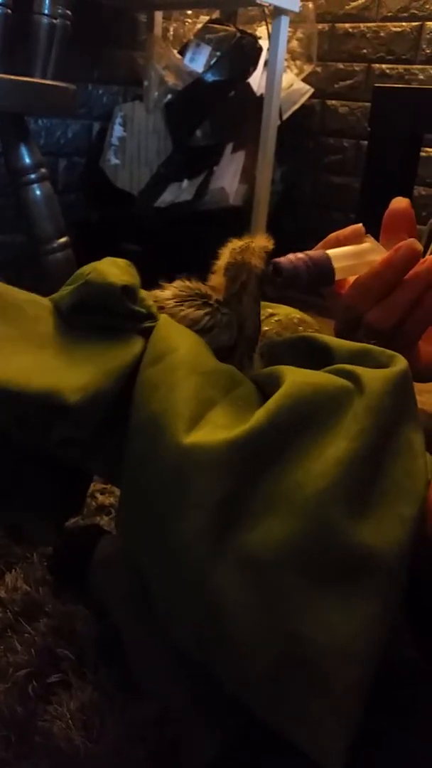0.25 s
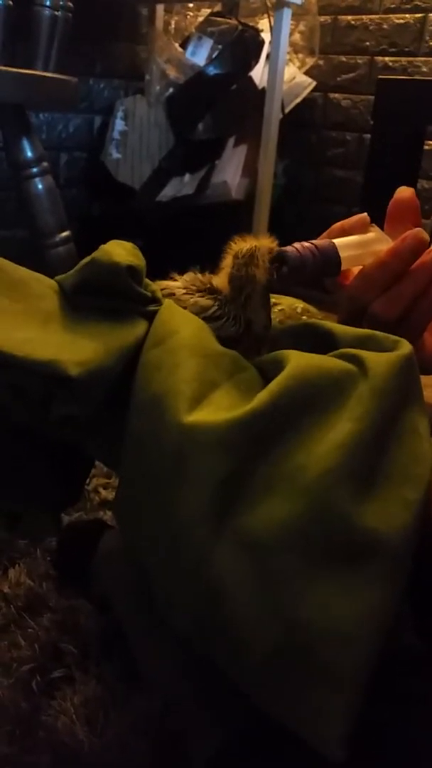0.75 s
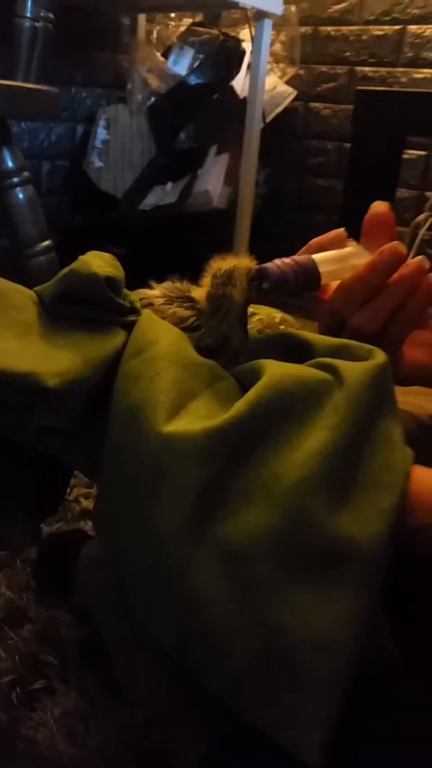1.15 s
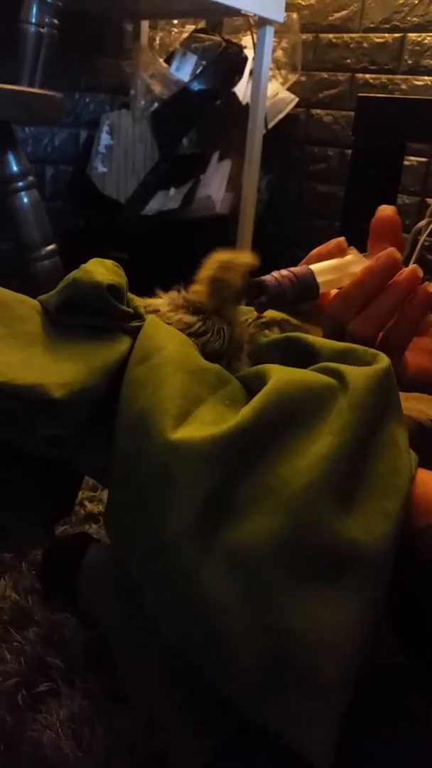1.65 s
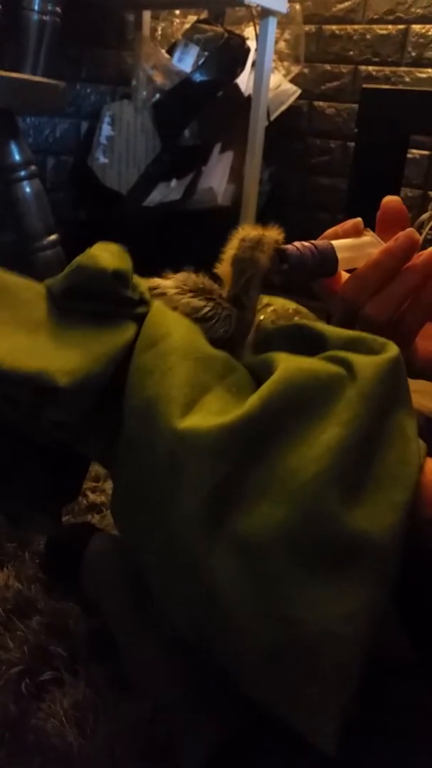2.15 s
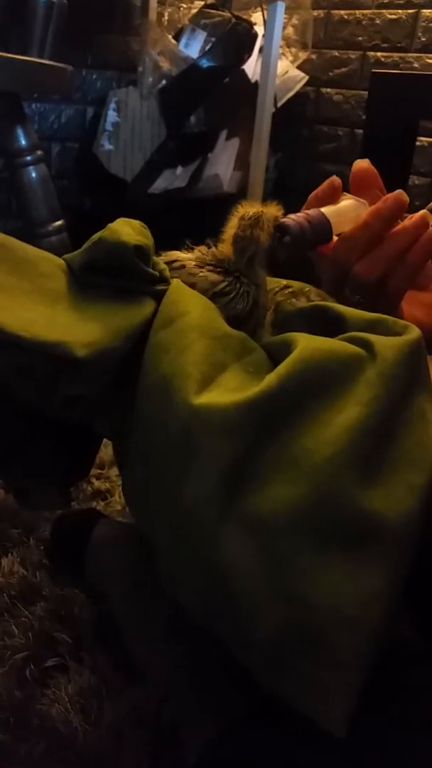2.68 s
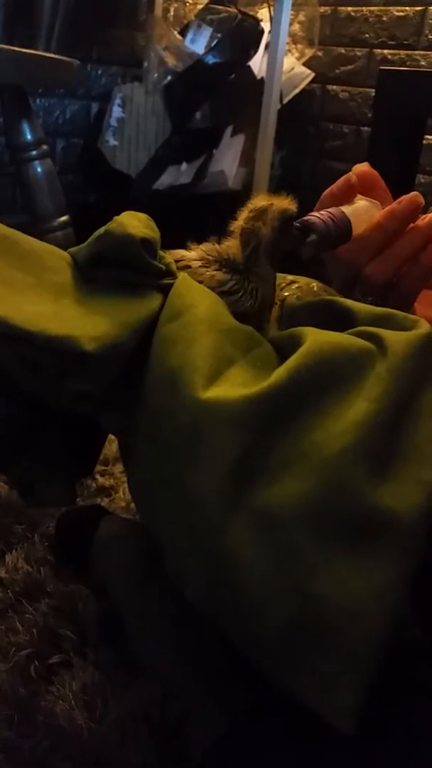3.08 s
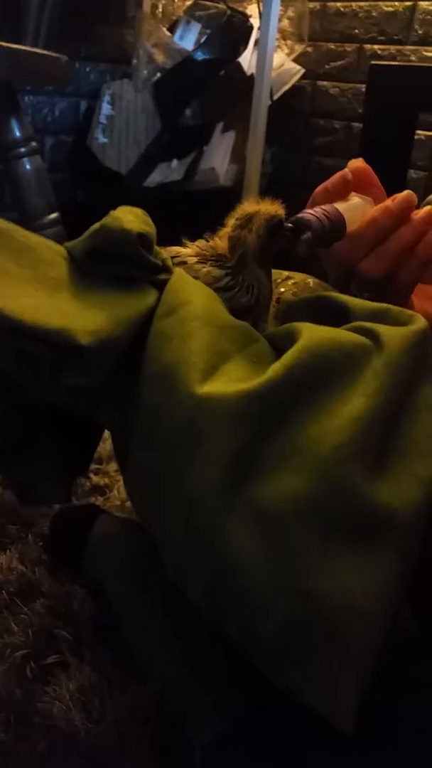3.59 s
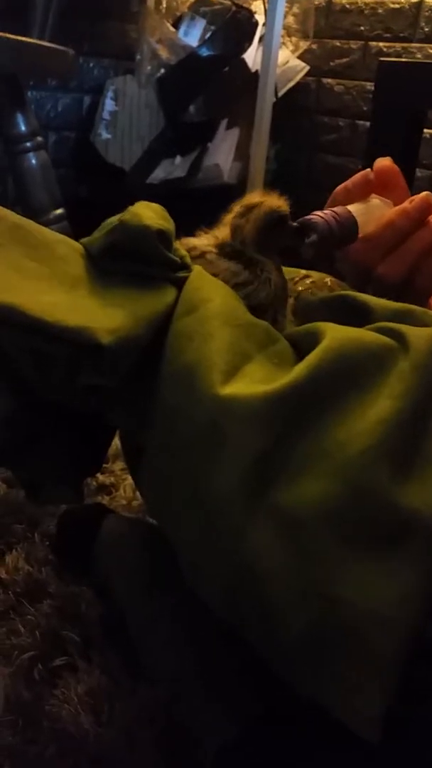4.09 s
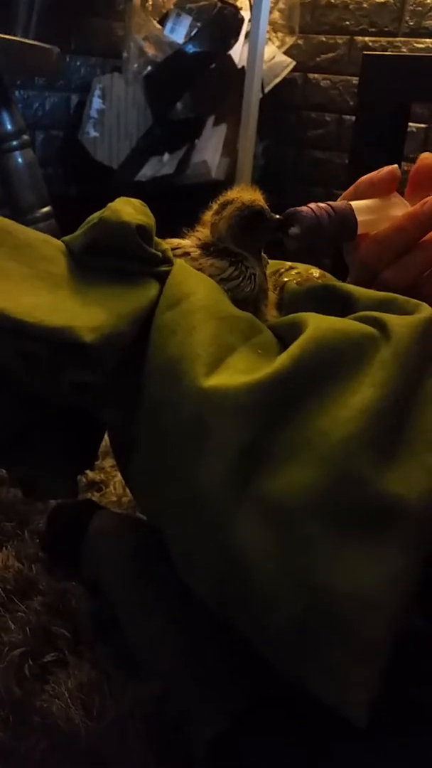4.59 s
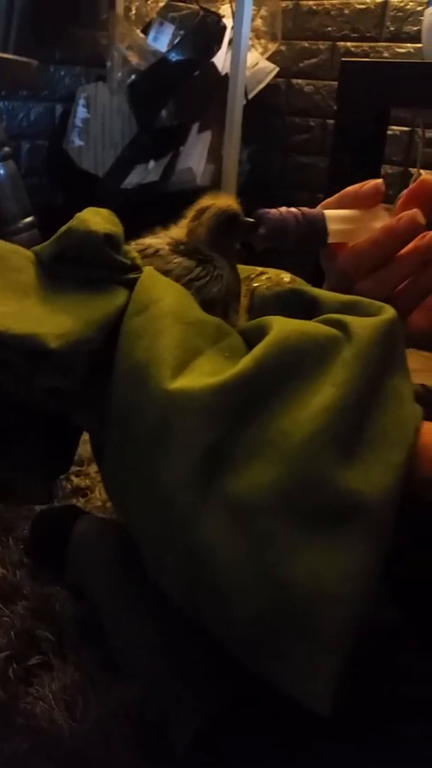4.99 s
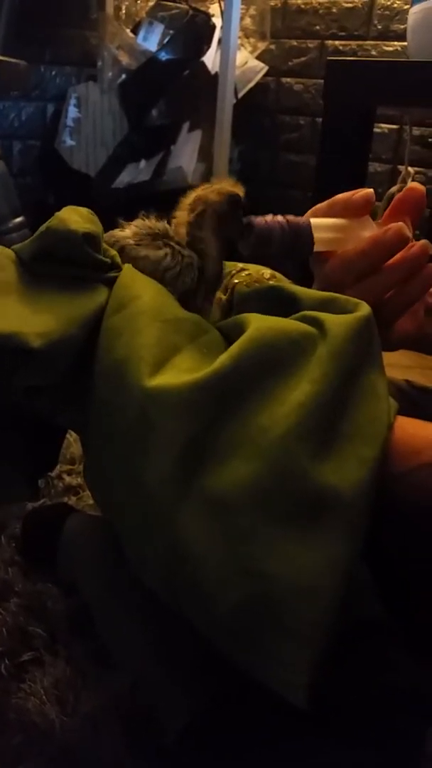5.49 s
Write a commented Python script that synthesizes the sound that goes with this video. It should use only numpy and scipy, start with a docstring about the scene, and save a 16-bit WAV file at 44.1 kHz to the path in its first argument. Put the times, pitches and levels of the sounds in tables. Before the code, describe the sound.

In a small, dry-sounding room, low motor hum and soft air noise come first. Then a young bird squeaks seven times at regular intervals, very high, two-toned and hoarse, with a tiny throaty gulp before each squeak. The background rises and sinks with the calls. Faint ticks appear midway, a sharper one near the end, and a barely audible peep after it. The microphone is close, with the calls leaning left.

```python
"""A low hum and the drone of a fan fill a small room; then a pigeon chick begs at a feeding syringe.
A soft wet gulp opens each of seven thin squeaks, which rise to a crest, fall and collapse into rasp.
The squeaks are two gliding whistles, one for each side of the syrinx, with side tones, noise and overtones.
Gulps and small clicks are struck resonances, the strongest click near the end; a faint peep follows it.
The background is filtered noise and two beating motor tones, and it swells around each squeak."""
import sys
import numpy as np
from scipy import signal
from scipy.fft import rfft, irfft
from scipy.io import wavfile

SR = 44100
rng = np.random.default_rng(int(sys.argv[2]) if len(sys.argv) > 2 else 0)


def generate_wav(signal):
    """Clip the signal to [-1, 1] and save it as 16-bit WAV at the path in sys.argv[1]."""
    frames = np.transpose(np.atleast_2d(signal))
    scaled = np.clip(frames, -1, 1) * 32767
    pcm = np.round(scaled).astype(np.int16)
    wavfile.write(sys.argv[1], SR, pcm)


N = 253198
TIME = np.arange(N) / SR
FREQS = np.maximum(np.arange(N // 2 + 1) * SR / N, 1)
DROP_S = .027   # length of the collapse that ends a squeak

# The squeaks. Each row: start, rise and fall in seconds, crest and foot of the high voice in Hz,
# gap down to the low voice at the foot in Hz, bend of the rise, bend of the fall (over 1 = early),
# flip of the low voice in seconds after the start and in Hz, lead of the high voice in dB,
# rasp over clean voice in dB while rising and while falling, hoarseness from 0 to 1.
SQUEAKS = [(.31, .232, .14, 7120, 5347, 360, 1.3, 1.1, .11, 900, -1.5, -12, -17.5, 0.91),
           (1.1, 0.21, 0.17, 6560, 5250, 251.9, 2.8, 2.3, .165, 652, -1, -4, -17, 0.704),
           (1.799, 0.21, 0.17, 7600, 5385, 524, .45, 1.29, 0.16, 1298, -1.5, -11, -21, 0.73),
           (2.5, 0.22, 0.15, 6950, 5740, 870, 2.1, 2.15, 0.11, 912, 3.5, -12, -14, 0.6),
           (3.22, .215, .151, 6710, 5800, 318.6, 3.8, 2.27, 0.093, 89, 3, -4.5, -5.5, 0.446),
           (3.981, 0.23, 0.16, 6930, 5130, 380, 2.9, 1.9, 0.084, -7, -1.5, -0.5, -11.5, .3),
           (4.754, .21, 0.14, 6863, 4764, 356, 3.6, 1.7, 0.25, 596, 8.5, 1.5, -7.5, 0.64)]


def from_db(db):
    """Level is logarithmic: 20 dB is a tenfold amplitude."""
    return 10 ** (np.asarray(db) / 20)


def rms_one(x):
    """Normalize the effective (root mean square) amplitude to 1."""
    return x / np.sqrt(np.mean(x ** 2) + 1e-20)


def blend(a, b, share):
    """Linear interpolation: a at share 0, b at share 1."""
    return a + (b - a) * share


def at_hz(points, axis=1):
    """Interpolate one column of a spectrum along logarithmic frequency."""
    points = np.array(points)
    return np.interp(np.log(FREQS), np.log(points[:, 0]), points[:, axis])


def colour(x, points, axis=1):
    """Linear filtering: each frequency is multiplied by its own gain."""
    return irfft(rfft(x) * from_db(at_hz(points, axis)), N)


def wobble(hz, size=N):
    """Low-passed noise: random motion up to about hz, of unit rms."""
    sos = signal.butter(2, min(hz, SR / 3), fs=SR, output="sos")
    settled = signal.sosfilt(sos, rng.standard_normal(size + SR // 10))[-size:]
    return rms_one(settled)


def resonate(x, modes):
    """Modal resonance: damped modes in parallel, whose bandwidth sets their decay."""
    out = 0
    for hz, width, db in modes:
        r = np.exp(-np.pi * width / SR)
        poles = [1, -2 * r * np.cos(2 * np.pi * hz / SR), r * r]
        mode = signal.lfilter([1, 0, -1], poles, x + 1e-18)
        out = out + from_db(db) * (1 - r * r) / 2 * mode
    return out


def phase_of(hz):
    """Phase is the time integral of frequency."""
    return 2 * np.pi * np.cumsum(hz) / SR


def place(x, left_db, right_db, count=12):
    """Stereo level and time differences: the left microphone hears it count samples earlier."""
    later = np.pad(x, (count, 0))[:N]
    return np.array([from_db(left_db) * x, from_db(right_db) * later])


def chick():
    """Directional radiation: the whistles favour the left microphone, their overtones the right."""
    # Loudness of each squeak. Each row: time in seconds, voices and overtones in dB before make-up gain.
    loudness_curves = [
        [(0.31, -63, -87.5), (0.32, -55.5, -99), (0.378, -81, -105), (0.446, -53, -62.5), (0.492, -51.5, -61),
         (0.51, -55, -67), (0.558, -44.5, -72), (0.568, -36.5, -57), (0.614, -42, -67), (0.648, -36, -57),
         (0.682, -36, -57.5), (0.712, -55, -63)],
        [(1.1, -61, -76), (1.136, -57, -64.5), (1.256, -42, -49.5), (1.268, -44, -41), (1.278, -41, -58),
         (1.29, -38, -45.5), (1.316, -43, -46), (1.326, -36.5, -49.5), (1.396, -34, -46), (1.446, -35.5, -50),
         (1.466, -30, -52.5), (1.498, -46.5, -67)],
        [(1.8, -63, -84), (1.83, -62, -100), (1.974, -58, -87), (2.044, -37, -62), (2.064, -40, -74),
         (2.104, -36, -54), (2.116, -33.5, -59), (2.126, -39, -52.5), (2.16, -44, -61), (2.185, -61, -76)],
        [(2.5, -53, -86), (2.55, -57, -81), (2.632, -41, -60.5), (2.644, -42.5, -63), (2.71, -36, -47),
         (2.73, -33.5, -58), (2.746, -35, -58), (2.754, -33.5, -50.5), (2.78, -35.5, -49.5),
         (2.866, -32.5, -47.5), (2.888, -38, -44.5), (2.9, -54, -42)],
        [(3.22, -60, -69), (3.264, -48.5, -62.5), (3.288, -43.5, -52.5), (3.362, -37.5, -50.5),
         (3.396, -34, -45), (3.418, -35.5, -50), (3.436, -37, -45), (3.58, -38, -44), (3.608, -35, -54),
         (3.62, -41, -60)],
        [(3.98, -54, -72), (3.994, -50.5, -70.5), (4.066, -44, -47), (4.132, -37, -46), (4.164, -35, -41),
         (4.18, -35, -44), (4.218, -31.5, -42), (4.296, -34, -42.5), (4.338, -40, -52.5), (4.362, -33, -52),
         (4.378, -42, -48), (4.396, -50.5, -52)],
        [(4.755, -59, -61.5), (4.771, -49.5, -81), (4.785, -55.5, -71), (4.895, -41, -54.5),
         (4.977, -39, -54.5), (5.037, -47.5, -54), (5.067, -45, -56), (5.075, -54.5, -56), (5.103, -43, -62),
         (5.13, -63, -55)],
    ]
    # A faint peep. Each row: time in seconds, pitch in Hz, level in dB.
    peep_curve = [(5.56, 6950, -82), (5.61, 7520, -67.5), (5.65, 7800, -79), (5.69, 7900, -95)]
    # Beak colour of the overtones. Each row: frequency in Hz, left and right gain in dB.
    beak_colour = [(7980, -29.5, -33), (9660, -10.5, -8), (10300, -3, -0.5), (11270, -7.5, 4.5),
                   (12470, -2, -2), (12930, -11, -9.5), (14500, -11, -15), (15400, -19, -20)]
    # Colour of the rasp. Each row: frequency in Hz, gain in dB.
    rasp_colour = [(3300, -35.5), (4500, -5), (6900, 7), (7700, -2), (8400, -16)]
    whistles, rasp, overtones = sum(
        squeak(call, loudness, rasp_width_hz=1010, flutter_hz=414.5, mixing=.3, fade_s=.005)
        for call, loudness in zip(SQUEAKS, loudness_curves))
    s, hz, db = np.transpose(peep_curve)
    peep_tone = np.sin(phase_of(np.interp(TIME, s, hz)))
    peep = from_db(np.interp(TIME, s, db)) * peep_tone * (TIME > s[0]) * (TIME < s[-1])
    voice = from_db(-0.36) * whistles + from_db(-6.0) * colour(rasp, rasp_colour) + peep
    left, right = place(overtones, left_db=-1.5, right_db=0.55, count=10)
    bright = np.array([colour(left, beak_colour, axis=1), colour(right, beak_colour, axis=2)])
    return place(voice, left_db=-0.7, right_db=-22) + bright


def squeak(call, loudness, rasp_width_hz, flutter_hz, mixing, fade_s):
    """Two coupled oscillators: modulation spreads their whistles into rasp, products give overtones."""
    start, rise_s, fall_s = call[:3]
    end = start + rise_s + fall_s + DROP_S
    hoarse = np.clip(call[-1], 0, 1)
    inside = (TIME > start - fade_s) & (TIME < end + fade_s)
    t = TIME[inside]
    n = len(t)
    low_hz, high_hz, low_gain, high_gain, rasp_gain, overtone_gain = controls(t, call, loudness)

    # every call ends ragged, whatever its own hoarseness before
    strain = np.interp((t - start) / (end - start), [0, .45, .75, 1], [hoarse, hoarse, .72, .9])
    # the low voice is unsteady while it is weak
    weak = np.clip(1 - low_gain / np.max(low_gain) * 4, 0, 1)
    low_jitter_hz = (45 * strain + 230 * weak * hoarse ** 2) * wobble(350, n) + 40 * wobble(45, n)
    low = phase_of(low_hz + low_jitter_hz)
    high_jitter_hz = 50 * strain * wobble(350, n) + 48 * wobble(50, n)
    high = phase_of(high_hz + high_jitter_hz)
    low_tone = np.exp(1j * low) * (1 + .28 * strain * wobble(200, n))
    high_tone = np.exp(1j * high) * (1 + .28 * strain * wobble(200, n))
    # the two sides take turns: as one surges the other sags
    turn = from_db(2.2 * np.tanh(wobble(35, n)) * (.4 + strain))
    whistles = np.sqrt(2) * (low_gain * low_tone * turn + high_gain * high_tone / turn)

    # a fast flutter sets rows of side tones beside the voices, and the two voices mix
    beat = phase_of(flutter_hz + 25 * wobble(40, n) + 70 * strain * wobble(150, n))
    side_tones = high_tone * (np.exp(-1j * beat) + .4 * np.exp(1j * beat) + .45 * np.exp(2j * beat))
    side_tones += 0.31 * low_tone * np.exp(-2j * beat)
    side_tones += mixing * np.exp(1j * (2 * high - low))
    # unsteady membranes spread noise around each whistle
    noise = 0
    for tone in (0.26 * low_tone, high_tone):
        noise = noise + tone * (wobble(rasp_width_hz, n) + 1j * wobble(rasp_width_hz, n))
    noise_share = .72 * strain
    rasp = np.sqrt(1 - noise_share) * side_tones / np.std(side_tones)
    rasp = rasp + np.sqrt(noise_share) * noise / np.std(noise)

    # doubled pitches, the sum tone of both voices, and their side tones
    grit = .55 * rasp * (high_tone + .8 * low_tone)
    products = 0.61 * low_tone ** 2 + 0.22 * low_tone * high_tone + 0.7 * high_tone ** 2
    overtones = np.real(products + grit)
    parts = np.array([whistles.real, np.sqrt(2) * rasp_gain * rasp.real,
                      overtone_gain * rms_one(overtones)])
    # a quick start and a softer end
    fade = np.clip(np.minimum((t - t[0]) / fade_s, (t[-1] - t) / (3 * fade_s)), 0, 1)
    out = np.zeros((3, N))
    out[:, inside] = parts * fade
    return out


def controls(t, call, loudness):
    """Frequency glides and energy sharing: pitches and gains of both voices, gains of rasp and overtones."""
    # Cracks of the voice. Each row: time and half length in seconds, sag of the high and of the low
    # voice in Hz, change of rasp in dB.
    cracks = [(.648, .014, 176, 227, -1), (1.368, .016, 149.5, 153, 6), (2.704, 0.023, 4.5, -6, 21),
              (2.778, 0.023, 544, 742, 13), (2.85, 0.01, -2.5, -1.5, 9), (3.382, .02, 323, 1, -9.5),
              (3.406, .012, 0.5, 2, 4.5), (4.277, 0.014, 220.5, 148.5, -2), (4.329, 0.017, 258, 304, 3)]
    # Balance of the voices. Each row: stage (0 start, 1 crest, 2 foot), high minus low in dB before the lead.
    voice_balance = [(0, 3), (.5, 1.5), (.97, 8.5), (1.14, -5.5), (1.5, 6), (2, -7)]
    high_start_hz, low_start_hz, low_crest_hz = 5490, 4030, 5962
    scoop_hz, scoop_s, flip_s = 551, .025, 0.024   # the low voice scoops up at once, then creeps, and flips
    low_fall_bend, low_linger = 1.1, 1.35   # it lingers at the crest, then falls a little faster
    high_end_hz, low_end_hz, drop_rasp_db = 4220, 3940, 18   # the pitch collapses into rasp
    turnover_s = 0.023   # the rasp level changes over this time around the crest
    voice_makeup_db, overtone_makeup_db = 6.5, 5.5

    (start, rise_s, fall_s, crest_hz, foot_hz, gap_hz, bend, fall_bend,
     flip_at_s, flip_hz, lead_db, rasp_up_db, rasp_down_db, _) = call
    age = np.maximum(t - start, 0)
    stages = [age / rise_s, (age - rise_s) / fall_s, (age - rise_s - fall_s) / DROP_S]
    up, down, drop = np.clip(stages, 0, 1)
    high_sag, low_sag, crack_db = sum(
        np.outer(depths, np.exp(-((t - s) / half_s) ** 2)) for s, half_s, *depths in cracks)

    # pitch: rise, fall, drop
    high_hz = crest_hz - (crest_hz - high_start_hz) * (1 - up) ** bend
    scoop = scoop_hz * (1 - np.exp(-age / scoop_s))
    flip = flip_hz * .5 * (1 + np.tanh((age - flip_at_s) / flip_s))
    creep = (low_crest_hz - low_start_hz - scoop_hz - flip_hz) * up
    low_hz = low_start_hz + scoop + flip + creep
    high_hz = blend(foot_hz, high_hz, (1 - down) ** fall_bend)
    low_hz = blend(foot_hz - gap_hz, low_hz, (1 - down ** low_linger) ** (low_fall_bend * fall_bend))
    high_hz = blend(high_hz, high_end_hz, drop) - high_sag
    low_hz = blend(low_hz, low_end_hz, drop) - low_sag

    # the voices and the rasp share the loudness
    falling = np.clip((age - rise_s) / turnover_s + .5, 0, 1)
    high_over_low = from_db(lead_db + np.interp(up + down, *np.transpose(voice_balance)))
    rasp = from_db(blend(rasp_up_db, rasp_down_db, falling) + crack_db + drop_rasp_db * drop)
    s, voice_db, overtone_db = np.transpose(loudness)
    clean = from_db(voice_makeup_db + np.interp(t, s, voice_db)) / np.hypot(1, rasp)
    low_gain = clean / np.hypot(1, high_over_low)
    overtone_gain = from_db(overtone_makeup_db + np.interp(t, s, overtone_db))
    return low_hz, high_hz, low_gain, low_gain * high_over_low, clean * rasp, overtone_gain


def gulps(slap_hz, hiss_throb):
    """Source and resonator: a short run of wet slaps rings the throat, with a hiss at the beak."""
    # The gulps. Each row: start and length in seconds, throat and wet hiss in dB before placing.
    gulp_rows = [(0.291, 0.013, -53, -55.5), (1.078, 0.017, -47, -49.5), (1.793, 0.021, -58, -60),
                 (2.485, 0.016, -57, -59), (3.208, 0.017, -52.5, -56), (3.949, 0.028, -47, -43.5),
                 (4.734, 0.017, -49.5, -53.5)]
    # Throat resonances. Each row: frequency and width in Hz, relative level in dB.
    throat_modes = [(334, 130, 6), (493, 270, 1), (663, 95, 6)]
    # Colour of the wet hiss. Each row: frequency in Hz, relative density in dB per Hz.
    wet_colour = [(1500, -17.5), (3000, -8), (4300, 10.5), (7000, -1), (8500, -22), (12000, -4),
                  (15500, -38)]
    throat_gain, hiss_gain = np.zeros((2, N))
    for s, length, throat_db, hiss_db in gulp_rows:
        half_round = np.sqrt(np.maximum(1 - (2 * (TIME - s) / length - 1) ** 2, 0))
        throat_gain += from_db(throat_db) * half_round
        hiss_gain += from_db(hiss_db) * half_round
    # an irregular slap rate; each slap decays through its cycle
    cycle = phase_of(slap_hz * np.exp(0.34 * wobble(250))) / (2 * np.pi) % 1
    slaps = np.exp(-6 * cycle) * (1 + hiss_throb * rng.standard_normal(N))
    throat = resonate(slaps * throat_gain, throat_modes) / np.std(resonate(slaps, throat_modes))
    throbbing_noise = np.exp(-2.5 * cycle) * rng.standard_normal(N)
    hiss = hiss_gain * rms_one(colour(throbbing_noise, wet_colour))
    return place(throat, left_db=2.0, right_db=-1.5) + place(hiss, left_db=0.0, right_db=-16.0)


def clicks():
    """Impulse response: hard ticks excite heavily damped modes."""
    # The clicks. Each row: time in seconds, strength of the impulse in dB.
    tick_rows = [(1.902, -45), (3.131, -41.5), (5.4998, -48), (5.526, -30.5)]
    # Resonances of the click. Each row: frequency and width in Hz, relative level in dB.
    tick_modes = [(1130, 204, 16), (4460, 690, -1.5), (7000, 1500, -43), (12900, 3000, -17)]
    hits = np.zeros(N)
    for s, db in tick_rows:
        hits[round(s * SR)] = -from_db(db)
    return place(resonate(hits, tick_modes), left_db=8.5, right_db=-4.5)


def room(x, t60, early_db, early_s, tail_db):
    """Reverberation: near scatter, then a faint decaying tail, independent at each microphone."""
    t = TIME[:SR // 2]
    out = x.copy()
    for decay, db in ((np.exp(-t / early_s), early_db), (from_db(-60 * t / t60), tail_db)):
        echoes = rng.standard_normal((2, len(t))) * decay * (t > .001)
        echoes /= np.sqrt(np.sum(echoes ** 2, axis=1, keepdims=True))   # unit energy
        out += from_db(db) * signal.fftconvolve(x, echoes, axes=1)[:, :N]
    return out


def background(air_db, fan_db, hum_db):
    """Superposition: partly coherent room tone, a fan's narrow drone, motors beating eight times a second."""
    # Room tone. Each row: frequency in Hz, left and right relative density in dB per Hz.
    room_tone = [(27, -11, -14), (44.6, 0, -4), (215.2, -2, -2), (266.6, -8.5, -9), (828, -8.5, -17.5),
                 (1224, -16.5, -22), (2300, -28, -32), (3300, -28, -36.5), (4040, -15, -30.5),
                 (5760, -30, -44.5), (7200, -27.5, -42), (8160, -50.5, -53.5), (11900, -41, -36),
                 (15500, -35.5, -40)]
    # Coherence of the room tone. Each row: frequency in Hz, left-right likeness from 0 to 1.
    likeness = [(100, 0.86), (300, 0.64), (700, 0), (1300, 0)]
    # Motor tones. Each row: frequency in Hz, level in dB before hum_db and placing.
    hum_tones = [(111.92, -60.5), (119.95, -57.4), (223.84, -73)]
    swell = from_db(swelling())
    alike = np.clip(at_hz(likeness), 0, 1)
    mid, side = rfft(rng.standard_normal((2, N))) * np.sqrt([1 + alike, 1 - alike])
    left = colour(irfft(mid + side, N), room_tone, axis=1)
    right = colour(irfft(mid - side, N), room_tone, axis=2)
    air = from_db(air_db) * rms_one(np.array([left, right]))
    fan = rms_one(resonate(rng.standard_normal(N), [(422.1, 11.5, 0)]))
    fan = from_db(fan_db) * place(fan, left_db=5.0, right_db=-5)
    hum = np.sqrt(2) * sum(from_db(db) * np.cos(2 * np.pi * hz * TIME) for hz, db in hum_tones)
    hum = from_db(hum_db) * place(hum, left_db=-0.74, right_db=-1.4)
    return swell * (air + fan + hum)


def swelling():
    """Amplitude modulation in dB: the background rises around each squeak and sinks after it."""
    # Slow drift of the background. Each row: time in seconds, level in dB before the swells.
    drift = [(0, 3.5), (.3, -1.8), (1.3, .4), (2.1, -0.5), (2.9, 0.65), (4.3, .5), (5.1, -1.7),
             (5.74, -0.7)]
    swell_db, rest_db = 7, -3.5
    lag_s, swell_rise_s, sink_s = 0.12, 0.48, 0.32   # the lag runs from crest to peak
    peaks = [start + rise_s + lag_s for start, rise_s, *_ in SQUEAKS]
    swell = np.max([np.interp(TIME - s, [-swell_rise_s, 0, sink_s], [0, 1, 0]) for s in peaks], axis=0)
    return rest_db + swell_db * swell + np.interp(TIME, *np.transpose(drift))


def scene():
    """Direct and reflected sound: the bird close by in a damped room, gulps and clicks almost dry."""
    bird = room(chick(), t60=.2, early_db=-8, early_s=.009, tail_db=-13)
    small_sounds = gulps(slap_hz=280.5, hiss_throb=0.98) + clicks()
    small_sounds = room(small_sounds, t60=0.26, early_db=-13, early_s=0.014, tail_db=-14.5)
    return bird + small_sounds + background(air_db=-56.5, fan_db=-66.0, hum_db=1.63)


def record(dry):
    """Band limiting: a steep elliptic low-pass cuts the top above 15750 Hz."""
    return signal.sosfilt(signal.ellip(12, .1, 90, 15750, fs=SR, output="sos"), dry)


dry = scene()
out = record(dry)
generate_wav(out)
```